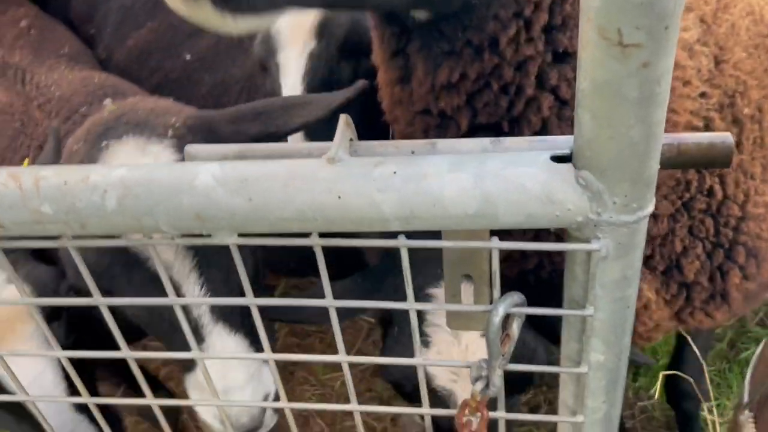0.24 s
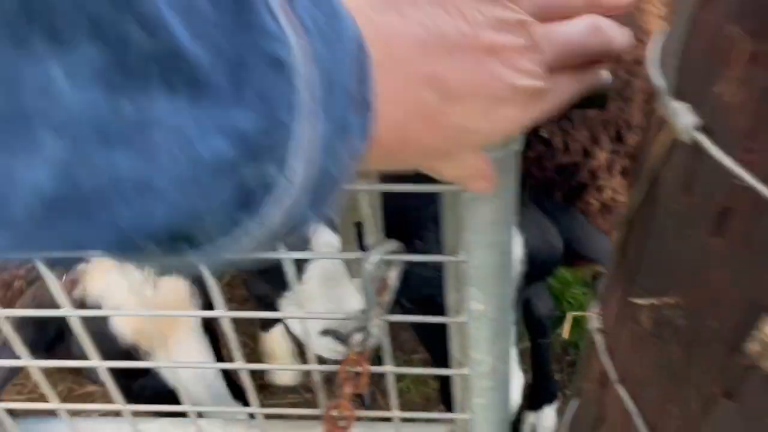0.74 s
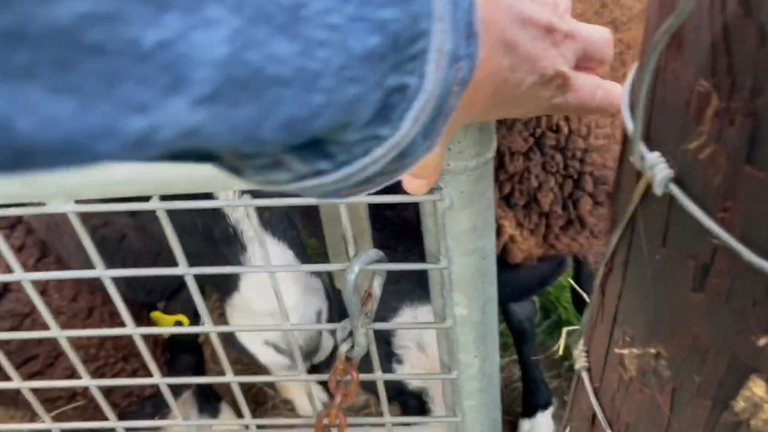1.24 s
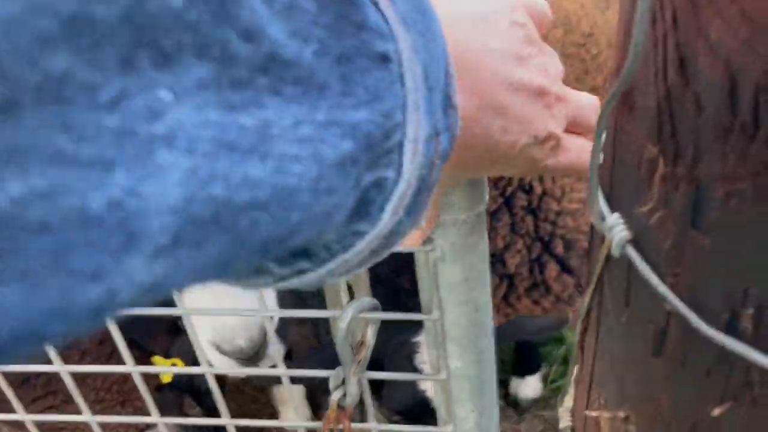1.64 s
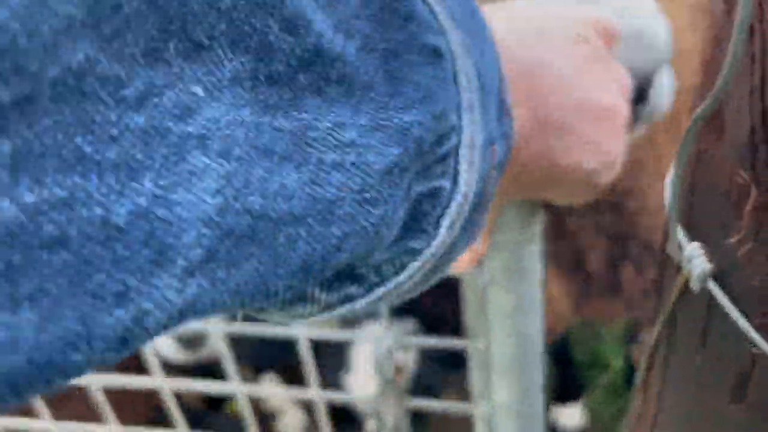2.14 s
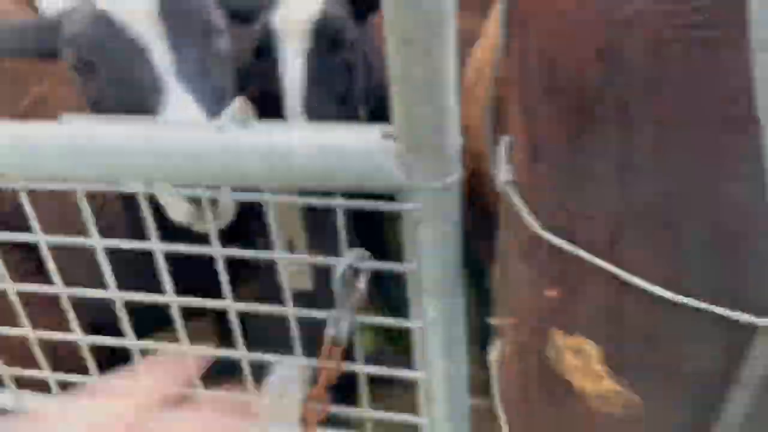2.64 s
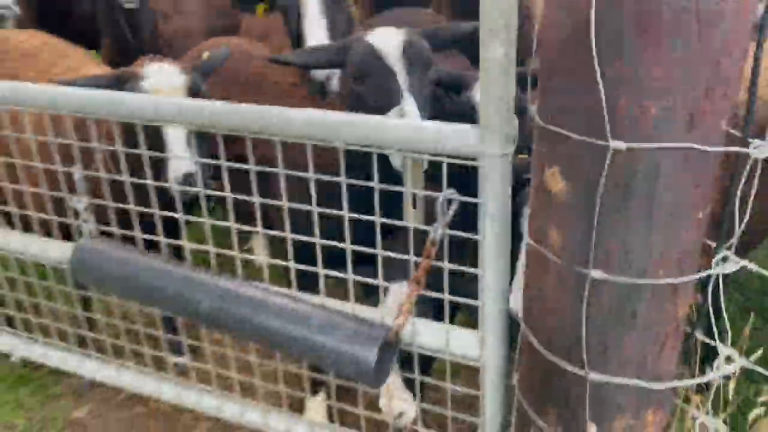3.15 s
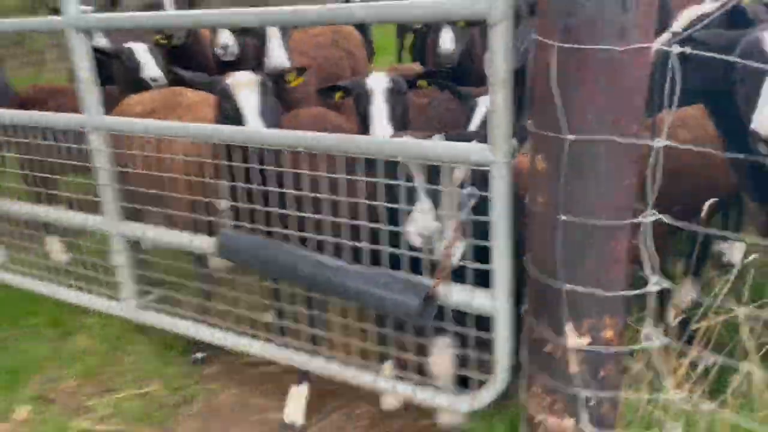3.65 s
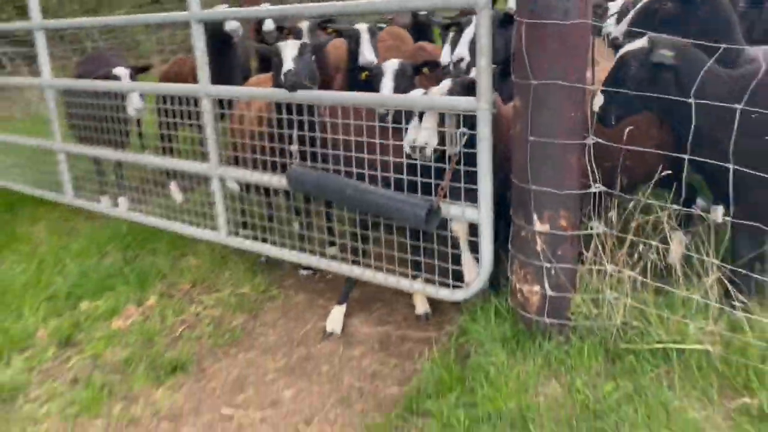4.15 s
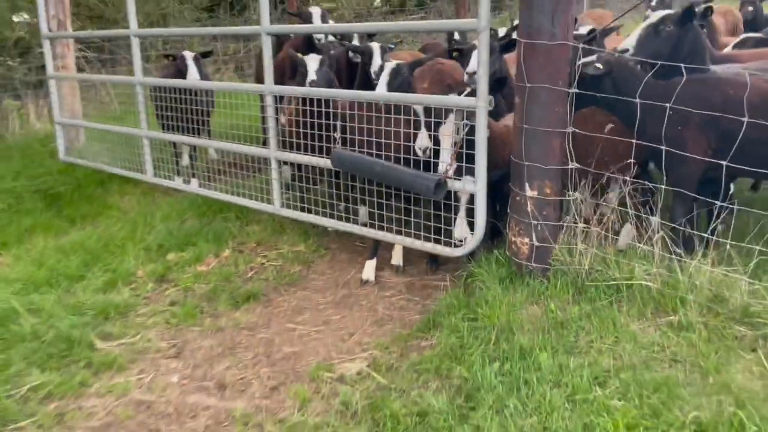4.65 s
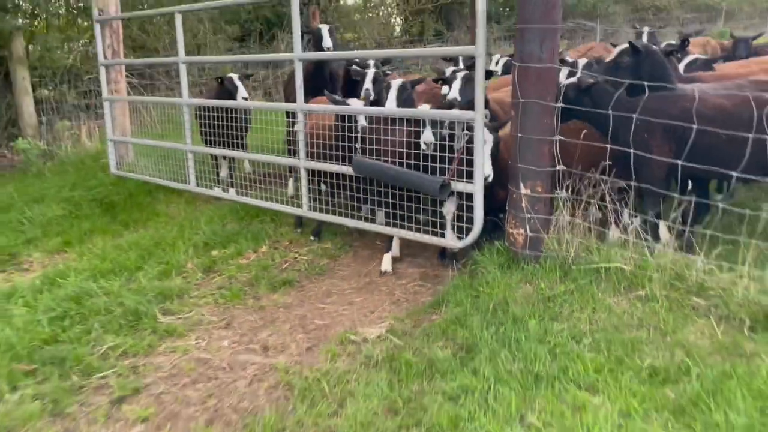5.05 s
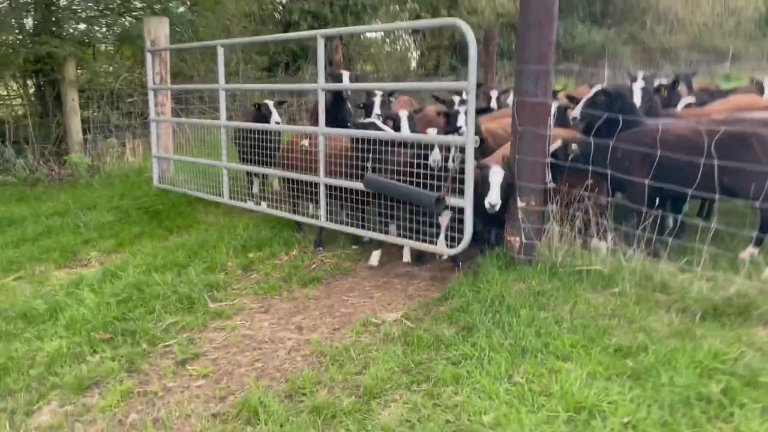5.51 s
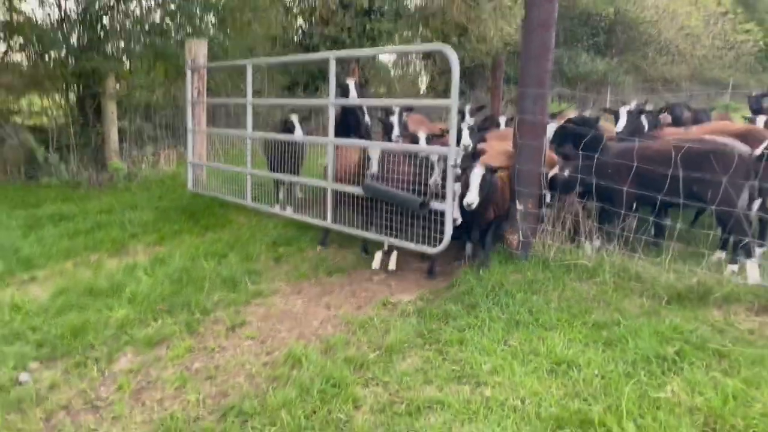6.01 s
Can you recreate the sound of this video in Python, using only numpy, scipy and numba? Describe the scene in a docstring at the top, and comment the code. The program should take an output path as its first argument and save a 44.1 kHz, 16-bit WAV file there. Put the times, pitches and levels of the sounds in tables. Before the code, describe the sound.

A sheep bleats in the distance. A bolt scrapes softly, then a metal gate gives one loud, ringing clank and rattles with its chain and wire mesh. Footsteps swish through grass with low thumps on the close microphone as the gate clanks again more lightly. A nearer sheep gives a deep bleat at the end. A shuffling flock, light wind and faint bird chirps fill the open field.

```python
"""A tubular field gate with wire mesh clanks loudly as its bolt is drawn, then rattles with its chain.
Each impact excites the bending modes of the tubes and the dense modes of the mesh; the bolt scrapes by
stick-slip friction. Sheep crowd the gate: one ewe bleats far off at the start, a deep one near at the
end, each a pulse train filtered by the throat. Wool and hooves shuffle, a person backs off through grass,
footfalls and wind thump in the bass, and short falling chirps sound across the field."""
import sys
import numpy as np
from scipy import signal
from scipy.fft import rfft, irfft, next_fast_len
from scipy.io import wavfile
from scipy.ndimage import uniform_filter1d
from numba import njit

SR = 44100
rng = np.random.default_rng(int(sys.argv[2]) if len(sys.argv) > 2 else 0)


def log_audio(samples):
    """Write samples as a 16-bit WAV file to the path given in sys.argv[1]."""
    # one column per channel
    frames = np.atleast_2d(samples).T
    # limit to full scale, then quantise
    limited = np.clip(frames, -1, 1)
    pcm = np.round(limited * 32767).astype(np.int16)
    wavfile.write(sys.argv[1], SR, pcm)


N = 276794
T = np.arange(N) / SR
STEP = 16  # samples between envelope points
SLOW = T[::STEP]
BANDS_HZ = 25 * 2 ** (np.arange(29) / 3)

# Clanks and rattles; the row at 1.934 s is a faint, brief swell of sound just before the loud clank.
# Each row: start in seconds, nominal level in dB, relative levels near 400 Hz, 5 kHz and 11 kHz in dB,
# damping from 0 to 1, left minus right in dB, emphasised pitch in Hz.
GATE_SOUNDS = [(0.7442, -31.5, -11, -43, -17, 0.81, 1.5, 1000),
               (0.8826, -40.5, -17, -1, -15, 0.6, 6.5, 3110), (1.866, -36.5, -4.5, -32, -30, 0.4, 2, 2310),
               (1.934, -32, -6.5, -16, -29, 0.4, 2, 2450), (1.955, -12, -6, -4.5, -3.5, 0.61, 3.5, 7200),
               (2.3796, -39.5, -8.5, -14, -27, 0.7, 6, 3372), (2.7, -51, 0.5, 1.5, 0, 1, 7, 3310),
               (2.711, -61, -9, 6, -2, 1, -3, 5700), (2.7405, -42, 6.5, -5, -5, 0.5, 3.5, 277),
               (2.7526, -31, -19, 0, -2, 0, 7, 1408), (2.7673, -29.5, -9, 1, 6.5, 0.53, 1.5, 11400),
               (2.783, -28, -16, -4.5, -2, 0.56, 1, 2025), (2.793, -31, -18, -6, 7, 1, -1, 2220),
               (2.8416, -35, 0, -2, 10, 1, 0, 2630), (2.9392, -35.5, -5, 1, 7, 0.83, 2.5, 556),
               (2.985, -42, -7, -1, -1, 0.4, 3, 1385), (3.0598, -42, -2, 4.5, 6, 0.6, 2, 6330),
               (3.149, -56, -6, 6, -7, 1, 0, 4400), (3.178, -46.5, -32, 1.5, -1, 0, 0, 6200),
               (3.621, -35.5, -14, -10, -48, 0.37, 3.5, 1380),
               (3.8278, -24.5, -18, -10.5, -24, 0.63, 1.5, 4770),
               (3.846, -39, -4.5, -13, -25, 0.3, 4, 2010), (4.795, -39, -14.5, -9, -27, 0.36, 1, 1460),
               (4.8389, -37.5, -21, -13, -26, 0.2, 4, 3780), (4.8585, -40.5, -5, -12, -32, 1, 0, 2740),
               (5.1634, -46, -11, -17, -15, 0.9, 6, 2670)]
# Modes of the steel tubes. Each row: frequency in Hz, relative level in dB, nominal T60 in seconds.
TUBE_MODES = [(177.7, 16, 0.41), (275.8, -8, 2.1), (283, -9.5, 1.75), (335, 0.5, 0.78), (384, -6, 0.74),
              (412, -5, 0.4), (435, -4.5, 0.27), (507.4, -1, 0.41), (532.7, 1.5, 0.62), (578.5, -2.5, 0.83),
              (560, -14, 1.5), (620, -7.5, 0.68), (638, -4, 0.67), (677, -9.5, 0.72), (705, 0, 0.53),
              (805, -7, 1.24), (873, -14, 1.0), (1082, -7.5, 0.71), (1254, -12, 1.0), (1385, -8, 0.25),
              (1477, -16, 0.14), (1600, -10, 0.69), (1795, -22.5, 0.59), (1916, -15, 0.8), (2025, -14, 0.3),
              (2255, -16, 0.4), (2376, -12, 0.55), (2590, -13, 0.7), (2622, -15, 0.64), (2694, -16, 0.7),
              (2760, -17, 0.57), (2832, -12, 0.8), (2864, -13, 0.7), (2945, -16, 0.7), (3246, -11, 0.65),
              (3343, -16, 0.6), (3480, -16, 0.27), (3720, -13, 0.57), (4370, -15, 0.5), (4772, -4, 0.15),
              (5060, -4, 0.34), (5340, -8, 0.11), (6550, -10.5, 0.27), (7150, -13, 0.12),
              (11400, -20, 0.22)]
# Ring of the wire mesh. Each row: frequency in Hz, nominal T60 in seconds.
MESH_DECAY = [(200, 0.36), (500, 1), (1000, 1), (2500, 1), (5000, 1), (9000, 0.96), (15000, 0.59)]
# Drags of the bolt in its sleeve. Each row: start and end in seconds, nominal level in dB, slips a second.
BOLT_DRAGS = [(1.24, 1.34, -52, 2100), (1.445, 1.602, -41.5, 1000), (1.667, 1.804, -52, 360),
              (1.808, 1.953, -54, 590)]
# The near call, then the far one. Each row: time in seconds, pitch in Hz, level in dB, gain of the
# resonances above 1 kHz in dB, share by which every second pulse weakens.
BLEATS = [
    [(5.715, 90.1, -66, 5, 0), (5.735, 91.6, -45.5, 10, 0.1), (5.768, 99.4, -37, 2, 0.19),
     (5.82, 101, -33, 6, 0), (5.85, 112.3, -33, 1.5, 0.35), (5.92, 116.9, -29, -0.5, 0.4),
     (5.95, 120.9, -31.5, 1.5, 0.1), (6.0, 121.5, -30.5, 3, 0), (6.07, 124, -30, 1, 0),
     (6.14, 123.7, -32.5, 5, 0.07), (6.19, 124.8, -30.5, 1.5, 0.04), (6.28, 123.1, -33, 5.5, 0)],
    [(0, 207.5, -43, 3, 0.1), (.05, 208.2, -43.5, -2.5, .1), (.16, 206.7, -43.5, -5.5, 0),
     (.246, 205, -44, 0.5, 0), (.27, 197.3, -51, 1, .3), (.3, 182, -47, -4, .3), (.33, 168, -63, -11, .3),
     (.36, 160, -80, -4, 0.4)],
]
# Formants of the two ewes. Each row: frequency in Hz, nominal width in Hz, gain in dB, share of frequency
# lost when slack, gain when slack in dB, drift in dB per second.
NEAR_FORMANTS = [(118, 133, -7.5, 0.052, -10, 3.5), (317, 180, -49, 0.016, -2, 4),
                 (646, 90, 5, 0.23, -2.5, -6.5), (920, 840, -19.5, 0.21, 6.5, 5),
                 (1330, 217, -7.5, 0.0084, 0, 7), (1714, 117, -10, 0.068, -1, 4),
                 (2220, 140, -32, 0.032, 17, 14), (2550, 480, -33, 0.086, 3, 5)]
FAR_FORMANTS = [(208, 140, -2.5, .1, 1, -1), (818, 57, -.5, 0.08, -3, 2), (1300, 130, -28, 0.033, 0, 60),
                (1800, 166, -3, 0.02, -2, -5), (2470, 204, -7, 0, 0, -10), (3150, 150, -14, 0.07, 0, -7)]
# Steps through grass. Each row: start in seconds, nominal level in dB, relative level at 3 kHz in dB,
# length in seconds.
GRASS_STEPS = [(0.041, -47, -2, 0.03), (1.812, -42, -7, 0.022), (3.478, -34.5, -4.5, 0.011),
               (3.694, -39, -14, 0.017), (3.73, -51, -6, 0.037), (3.79, -51.5, 1, 0.24),
               (3.986, -47, -8, 0.026), (4.381, -40, -8, 0.011), (4.507, -42.5, -10, 0.074),
               (4.626, -47, 2, 0.037), (4.788, -50, 4, 0.016), (5.199, -49.5, 6, 0.064),
               (5.376, -47.5, 3.5, 0.056), (5.784, -48.5, 1, 0.038), (5.887, -43.5, -2, 0.025),
               (6.063, -41.5, 1, 0.019)]
# Thumps of feet, wind and gate. Each row: start in seconds, peak in dB, nominal pitch in Hz, cycles.
THUMPS = [(0.304, -36.5, 89, 2.9), (0.531, -30, 83, 4.3), (0.599, -32, 78.1, 1.9), (0.839, -39, 72.6, 2.4),
          (1.121, -37, 80, 4.1), (2.737, -33.5, 113, 2.6), (2.736, -25.5, 296, 13), (3.126, -49.5, 99, 5.2),
          (3.54, -39, 79.4, 4.2), (3.708, -24.5, 87, 2.6), (4.015, -28.5, 70.3, 3.7), (4.439, -29, 71, 3),
          (4.519, -28, 69, 2.8), (4.657, -25, 69.5, 3.2), (4.761, -30, 71, 3.5), (4.954, -26, 69, 3.8),
          (5.702, -35.5, 114, 3.9)]
# Falling chirps. Each row: start and length in seconds, first and last pitch in Hz, level in dB,
# relative level of the octave below in dB.
CHIRPS = [(1.037, 0.038, 2730, 2340, -55, -23), (1.435, 0.036, 3720, 3600, -59, -30),
          (1.471, 0.031, 2430, 2060, -48.5, -3), (2.532, 0.024, 2594, 1856, -45, -26),
          (2.569, 0.024, 1780, 1350, -51, -5), (2.556, 0.035, 2406, 2000, -50, -18),
          (3.314, 0.045, 2757, 2045, -41, -7.5), (3.34, 0.03, 2590, 2440, -44.5, -24),
          (3.702, 0.037, 2340, 1960, -44, -29.5), (4.135, 0.063, 2416, 1953, -47, -7),
          (4.257, 0.033, 1018, 895, -43.5, -22), (4.392, 0.069, 2414, 1640, -42, -21),
          (4.559, 0.022, 2270, 2020, -49.5, -30), (4.597, 0.043, 1780, 1580, -49, -35),
          (4.643, 0.032, 2270, 2060, -46, -30), (4.673, 0.046, 2564, 2070, -42.5, -2.5),
          (4.933, 0.023, 2130, 1880, -44, -5), (5.079, 0.051, 1844, 1530, -44.5, -30),
          (5.296, 0.028, 4470, 4400, -54.5, -27), (5.378, 0.049, 4350, 4250, -53.5, -38),
          (5.222, 0.022, 4550, 4470, -57, -30), (5.478, 0.031, 3830, 3730, -57.5, -30)]
# Levels of the wind, the shuffling flock and the rustling grass. Each row: time in seconds, level in dB.
WIND_LEVEL = [(0.0, -49.5), (.33, -50.5), (.59, -49.5), (.93, -50.5), (1.06, -53.5), (1.85, -54),
              (1.95, -47), (2.29, -56), (2.71, -53), (2.78, -41), (2.9, -46), (3.18, -56), (3.81, -52.5),
              (3.91, -40.5), (4.12, -54.5), (4.58, -42), (5.07, -49), (5.5, -52), (5.84, -47),
              (5.94, -45.5), (6.28, -46.5)]
FLOCK_LEVEL = [(0.0, -51.5), (.26, -49.5), (.35, -59), (.6, -56), (.95, -54), (1.21, -56.5), (1.45, -53),
               (1.61, -58), (1.85, -45.5), (2.45, -50.5), (2.6, -55.5), (2.72, -52), (3.05, -47.5),
               (3.49, -51), (3.65, -47.5), (3.81, -52), (4.3, -51), (4.72, -50), (4.85, -49.5), (5.44, -52),
               (5.68, -53), (6.28, -47)]
GRASS_LEVEL = [(0.0, -60.5), (.6, -59), (1.21, -65.5), (1.7, -57), (2.7, -60.5), (3.2, -66.5),
               (3.49, -56.5), (3.8, -53), (3.91, -50.5), (4.2, -57.5), (4.6, -55.5), (5.44, -60),
               (5.9, -55), (6.28, -53)]
# Spectra of the noise layers. Each row: frequency in Hz, relative spectral density in dB.
SHUDDER_SPECTRUM = [(100, -6), (200, -4.5), (550, 1), (1000, 0.5), (2500, -8.5), (3500, -5.5),
                    (6000, -14.5), (12000, -24)]
WIND_SPECTRUM = [(20, -39), (35, -13), (60, 11.5), (100, 6), (160, -1), (300, -35)]
FLOCK_SPECTRUM = [(100, 1), (200, 7.5), (500, 4.5), (1000, 1.5), (2500, -3.5), (3500, -11), (6000, -32.5)]
GRASS_SPECTRUM = [(2000, -46), (4000, 8), (6000, 5.5), (8000, 4.5), (11000, 1), (13000, -46), (14000, -5),
                  (15500, 6)]
# Likeness of the sound at two microphone ports. Each row: frequency in Hz, left-right correlation.
PORT_CORRELATION = [(60, .9), (350, .88), (1000, .55), (1700, .4), (3500, .68), (5300, .5), (6500, .7),
                    (7600, .93), (8200, .995), (8900, .95), (9600, .7), (10700, .85), (11400, .995),
                    (12100, .98), (13000, .62), (14100, .9), (14800, .995)]
# Phase between the ports. Each row: frequency in Hz, lead of the left in radians.
PORT_PHASE = [(0, 0), (800, .4), (1700, -.3), (2700, .4), (5200, .5), (5900, -.3), (6550, -.9),
              (7250, -2.1), (7900, -3.05), (8700, -3.2), (9300, -4.2), (10000, -4.9), (10700, -5.9),
              (11300, -6.28), (12100, -6.3), (12750, -7.1), (13450, -8.3), (14100, -9), (14700, -9.42),
              (22050, -9.42)]


def excitation_db(event, hz):
    """Excitation spectrum: the level that one gate sound gives to a frequency."""
    _, db, low, high, air = event[:5]
    bass = [(120, low - 36), (215, low - 20), (275, low - 4), (450, low + 2), (700, low + 1)]
    middle = [(950, -6.5), (1800, -5), (2800, -.5)]
    treble = [(5000, high - 3), (6000, high - 3), (7300, high + 4), (11000, air - 5), (15000, air - 6)]
    return db + at_hz(bass + middle + treble, hz)


def gate_tubes(db=-3, scatter_db=2, boost_db=18, reach_octaves=.061, travel_s=.0057, spread_s=.04):
    """Modal vibration: the tubes ring as damped sinusoids, boosted near each sound's emphasised pitch."""
    out = np.zeros((2, N))
    hz, mode_db, t60 = np.transpose(TUBE_MODES)[:, :, None]
    for event in GATE_SOUNDS:
        damping, pan_db, pitch_hz = event[5:]
        i = int(event[0] * SR)
        t = T[:min(N - i, int(.7 * SR))]
        scatter, detune, skew, onset_phase = rng.standard_normal((4, len(TUBE_MODES), 1))
        boost = undb(boost_db * np.exp(-(np.log2(hz / pitch_hz) / reach_octaves) ** 2))
        gain = undb(excitation_db(event, hz) + mode_db + db + scatter_db * scatter)
        local = 1 + (boost - 1) * (.21 + .89 * np.exp(-t / spread_s))  # energy spreads over the frame
        phase = 2 * np.pi * hz * t * (1 + .00066 * detune) + np.pi * onset_phase
        rise = 1 - np.exp(-t * (hz / 300) ** .78 / travel_s)  # low bending waves travel slowly
        decay = np.exp(-np.log(1000) * t / (t60 * np.clip(1.3 - damping, .1, 2)))
        envelope = gain * local * rise * decay
        port_shift = np.arccos(at_hz(PORT_CORRELATION, hz)) * 1.22 * skew
        ring = [(envelope * np.sin(phase + shift)).sum(0) for shift in (0, port_shift)]
        out[:, i:i + len(t)] += pan(pan_db) * ring
    return out


def gate_knocks(db=-6, damped_boost_db=12, decay_s=.0022):
    """Onset transient: each gate sound opens with a dry tick, stronger where the damping is high."""
    out = np.zeros((2, N))
    t = T[:400]
    for event in GATE_SOUNDS:
        damping, pan_db = event[5:7]
        i = int(event[0] * SR)
        tick = sum(undb(excitation_db(event, hz)) * np.sin(2 * np.pi * hz * t)
                   for hz in (876, 1470, 3090, 5790))
        envelope = undb(db + damped_boost_db * damping) * np.exp(-t / decay_s)
        out[:, i:i + len(t)] += envelope * tick * pan(pan_db)
    return out


def mesh_power(hz, crack_db=6, crack_s=.011, db=-17):
    """Modal overlap: countless wire modes merge into band power, a crack and then a damped ring."""
    out = np.zeros((2, len(SLOW)))
    radiation_db = -12 * np.clip(1.2 - hz / 600, 0, 1)  # thin wires radiate little bass
    width = np.clip(1.6 - hz / 5000, 0, 1)  # the treble reaches both ports alike
    for event in GATE_SOUNDS:
        damping, pan_db = event[5:7]
        t = np.maximum(SLOW - event[0], 0)
        t60 = at_hz(MESH_DECAY, hz) * np.clip(1.2 - damping, .1, 2)
        rise = 1 - np.exp(-t * hz / .72)  # the lows build more slowly
        ring = np.exp(-2 * np.log(1000) * t / t60) + undb(crack_db) ** 2 * np.exp(-t / crack_s)
        out += (pan(pan_db * width) * undb(excitation_db(event, hz) + db + radiation_db)) ** 2 * rise * ring
    return out


def shudder_db(gain_db=-7, rise_s=.014, t60=1):
    """Free vibration: the level of the whole gate shaking on its hinges builds late and dies slowly."""
    power = 0
    for start, db, low_db, *_ in GATE_SOUNDS:
        t = np.maximum(SLOW - start, 0)
        envelope = (1 - np.exp(-t / rise_s)) * np.exp(-np.log(1000) * t / t60)
        power += (undb(db + low_db + gain_db) * envelope) ** 2
    return 10 * np.log10(power + 1e-12)


def bolt_scrapes(t60_share=.0085, spread_db=1.5, top_hz=3000):
    """Stick-slip friction: uneven slips ring the hand-damped tubes; each drag grows and stops dead."""
    slips = np.zeros(N)
    chance, size = rng.random(N), undb(spread_db * rng.exponential(size=N))
    for start, end, db, rate in BOLT_DRAGS:
        progress = (T - start) / (end - start)
        envelope = undb(db) * np.clip(4 * progress, 0, 1) * (progress < 1)
        slips += envelope * (chance < rate / SR) * size * np.sqrt(SR / rate)
    t, body = T[:4096], 0
    for hz, db, t60 in TUBE_MODES:
        gain = undb(db / 2) / (1 + (hz / top_hz) ** 4)
        body += gain * np.exp(-np.log(1000) * t / (t60_share * t60)) * np.sin(2 * np.pi * hz * t)
    return signal.fftconvolve(slips, unit_energy(body))[:N] * undb(-3) * pan(3.6)


def bleat(call, formants, breath_db, pan_db, patchy_db, roam, scatter=.3):
    """Source and filter: fold pulses and breath excite the throat; at low pitch the folds go slack."""
    times, *columns = np.transpose(call)
    hz, db, upper_db, weakening = (np.interp(T, times, c) for c in columns)
    slack = np.clip((1 - hz / hz.max()) / .24, 0, 1)  # fully slack 24 % below the top pitch
    rough = .1 + .6 * slack ** 1.5
    hz = hz * (1 + .004 * upsample(walk(18)))  # unsteady breath
    chance = rng.standard_normal((3000, 2))
    breath = undb(breath_db) * (.18 + rough) * rng.standard_normal(N)
    even = unit_rms(vocal_folds(hz, rough, np.zeros(N), chance)) + breath
    alternating = unit_rms(vocal_folds(hz, rough, weakening, chance)) + breath
    elapsed, voice = np.clip(T, times[0], times[-1]) - times[0], 0
    for k, (f, width, gain_db, drop, slack_db, drift_db) in enumerate(formants):
        source = alternating if f > 800 else even
        shift, swell = upsample(walk(12)), upsample(walk(12))  # jaw and tongue keep moving
        centre = f * (1 - drop * slack + roam * shift * (f > 1000))
        level_db = gain_db + slack_db * slack + drift_db * elapsed + upper_db * (f > 1000)
        gain = undb(level_db + patchy_db * swell * min(f / 1800, 1))
        voice += (-1) ** k * gain * resonator(resonator(source, centre, 1.22 * width), centre, 1.22 * width)
    on = (T >= times[0]) & (T < times[-1])
    envelope = undb(db + .8 * upsample(walk(25))) * on
    voice = voice / np.sqrt(np.mean(voice[on] ** 2)) * envelope
    echoes = unit_energy(rng.standard_normal((2, 1500)) * np.exp(-T[:1500] / .008))  # turf, post, flock
    scattered = signal.fftconvolve(voice[None], echoes, axes=1)[:, :N]
    return (voice + scatter * scattered) * pan(pan_db) / np.hypot(1, scatter)


@njit
def vocal_folds(hz, rough, weakening, chance):
    """Glottal pulses: one a cycle, with jitter and shimmer; every second pulse may be weaker."""
    out, phase, k = np.zeros(len(hz) + 1), 0., 0
    for i in range(len(hz)):
        step = hz[i] * (1 + .1 * rough[i] * chance[k, 0]) / SR
        phase += step
        if phase >= 1:
            phase, k = phase - 1, k + 1
            size = np.exp(.5 * rough[i] * chance[k, 1]) * (1 - weakening[i] * (k % 2))
            out[i] += size * phase / step
            out[i + 1] += size * (1 - phase / step)
    return out[:-1]


@njit
def resonator(x, hz, width):
    """Resonance: a state-variable band-pass with unit gain at its moving centre."""
    y, band, low = np.empty(len(x)), 0., 0.
    for i in range(len(x)):
        g, damping = np.tan(np.pi * hz[i] / SR), width / hz[i]
        v = (band + g * (x[i] - low)) / (1 + g * (g + damping))
        band, low, y[i] = 2 * v - band, low + 2 * g * v, damping * v
    return y


def thumps():
    """Soft impacts carry only bass: a windowed tone for each footfall, gust or push on the gate."""
    out = np.zeros(N)
    for start, db, hz, cycles in THUMPS:
        progress = np.clip((T - start) * hz / cycles, 0, 1)
        out += undb(db) * np.sin(np.pi * progress) ** 2 * np.sin(2 * np.pi * hz * .971 * (T - start))
    return out


def swish_power(hz, gain_db=-14):
    """Friction noise: band power of the quick bright bursts as grass blades whip past a boot."""
    out = np.zeros(len(SLOW))
    for start, db, low_db, length in GRASS_STEPS:
        t = np.maximum(SLOW - start, 0)
        colour_db = at_hz([(3000, low_db), (11000, 4), (15000, -11)], hz)
        out += undb(db + colour_db + gain_db) ** 2 * (1 - np.exp(-t / .002)) * np.exp(-2.5 * t / length)
    return out


def chirps(echo_s=.04, echo_db=-3, bend=2.19, far_db=-58, far_count=60):
    """Frequency glides: notes hold, then drop, over faint far ones, all smeared by echoes off trees."""
    out = np.zeros(N)
    far = [(2.4 + 3.1 * when, .035, 1100 + 1700 * pitch, 900 + 1400 * pitch, far_db + 6 * level, -15)
           for when, pitch, level in rng.random((far_count, 3))]
    for start, length, hz0, hz1, db, octave_db in CHIRPS + far:
        span = slice(int(start * SR), int((start + length) * SR))
        progress = np.abs(T[span] - start) / length
        phase = 2 * np.pi * length * (hz0 * progress + (hz1 - hz0) * progress ** (bend + 1) / (bend + 1))
        tone = np.sin(phase) + undb(octave_db) * np.sin(phase / 2)
        out[span] += undb(db) * np.sin(np.pi * progress) * tone
    out *= undb(3.5 * upsample(walk(350)))  # the level flutters
    t = T[:8000]
    trees = unit_energy(rng.standard_normal((2, len(t))) * np.exp(-t / echo_s) * (t > .012))
    return out + undb(echo_db) * signal.fftconvolve(out[None], trees, axes=1)[:, :N]


def noise_layers():
    """Incoherent sources add in power: mesh, swishes, wind, flock, grass and shudder, band by band."""
    levels = [np.interp(SLOW, *np.transpose(table)) for table in (WIND_LEVEL, FLOCK_LEVEL, GRASS_LEVEL)]
    levels.append(shudder_db())
    spectra = WIND_SPECTRUM, FLOCK_SPECTRUM, GRASS_SPECTRUM, SHUDDER_SPECTRUM
    totals_db = [10 * np.log10(np.sum(undb(at_hz(s, BANDS_HZ)) ** 2 * BANDS_HZ)) for s in spectra]
    out, jostle, blades = 0, walk(9), walk(14)
    for hz, noise in band_noise():
        flickers_db = [3 * walk(12), 1.6 * jostle + 2.2 * walk(14),
                       1.6 * blades + 1.4 * walk(25), 2 * walk(14)]
        bed = sum(hz * undb(db + at_hz(spectrum, hz) - total + flicker) ** 2
                  for db, spectrum, total, flicker in zip(levels, spectra, totals_db, flickers_db))
        power = bed + swish_power(hz) + mesh_power(hz) * undb(.45 * walk(60)) ** 2
        out += noise * [upsample(gain) for gain in np.sqrt(power)]
    return out


def band_noise():
    """Partial coherence: third-octave stereo noises of rms 1, correlated as the two ports hear them."""
    size = next_fast_len(N)
    f = np.fft.rfftfreq(size, 1 / SR) + 1
    mid, side = rfft(rng.standard_normal((2, size)))
    correlation = at_hz(PORT_CORRELATION, f)
    pair = np.sqrt(1 + correlation) * mid + np.sqrt(1 - correlation) * side * np.array([[1], [-1]])
    for hz in BANDS_HZ:
        shape = np.cos(np.clip(3 * np.log2(f / hz), -1, 1) * np.pi / 2)
        yield hz, unit_rms(irfft(pair * shape, size)[:, :N])


def walk(rate):
    """Slow fluctuation: random levels held 1 / rate seconds and smoothed twice; spread near 1."""
    k = int(SR / STEP / rate)
    held = np.repeat(rng.standard_normal(len(SLOW) // k + 1), k)
    return 1.69 * uniform_filter1d(uniform_filter1d(held, k), k)[:len(SLOW)]


def at_hz(table, hz):
    """Interpolation of (Hz, value) points on a log-frequency axis."""
    f, values = np.transpose(table)
    return np.interp(np.log(hz), np.log(f), values)


def upsample(envelope):
    return np.interp(T, SLOW, envelope)


def undb(db):
    return 10 ** (np.asarray(db) / 20)


def pan(db):
    return undb(np.array([[db / 2], [-db / 2]]))


def unit_rms(x):
    return x / np.sqrt(np.mean(x ** 2))


def unit_energy(x):
    return x / np.sqrt(np.sum(x ** 2, axis=-1, keepdims=True))


def scene():
    """Superposition: gate, ewes and field add as sound pressures."""
    near = bleat(BLEATS[0], NEAR_FORMANTS, breath_db=-11.5, pan_db=1.5, patchy_db=1.1, roam=.008)
    far = bleat(BLEATS[1], FAR_FORMANTS, breath_db=-16, pan_db=4.5, patchy_db=3, roam=.03)
    return noise_layers() + gate_knocks() + gate_tubes() + bolt_scrapes() + thumps() + chirps() + near + far


def record(dry, drive=.92, top_hz=15900):
    """Phase shift and saturation: the ports differ in phase, loud peaks round off, the top is cut."""
    size = next_fast_len(N + 4096)
    lead = np.interp(np.fft.rfftfreq(size, 1 / SR), *np.transpose(PORT_PHASE))
    ports = irfft(rfft(dry, size) * np.exp(.5j * np.array([lead, -lead])), size)[:, :N]
    lowpass = signal.ellip(10, .2, 80, top_hz, fs=SR, output="sos")
    return signal.sosfilt(lowpass, np.tanh(drive * ports))


dry = scene()
out = record(dry)
log_audio(out)
```